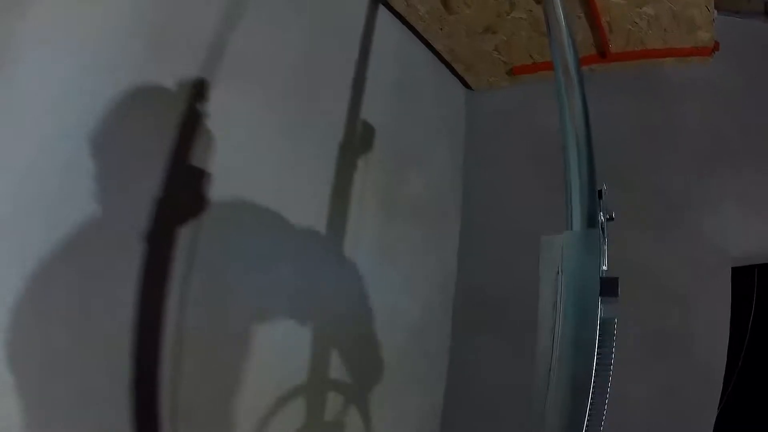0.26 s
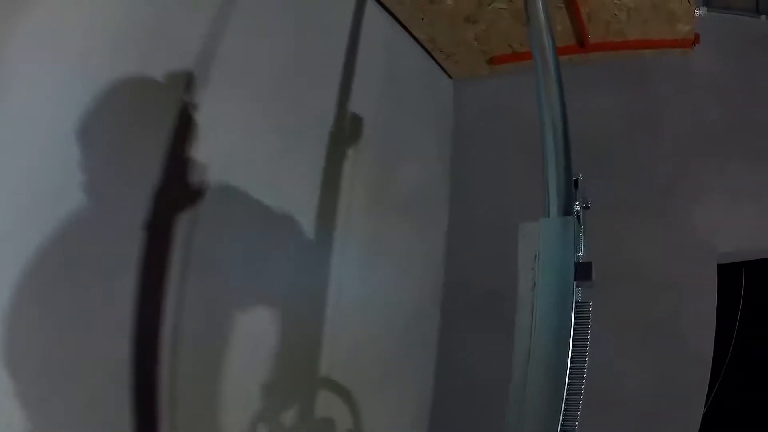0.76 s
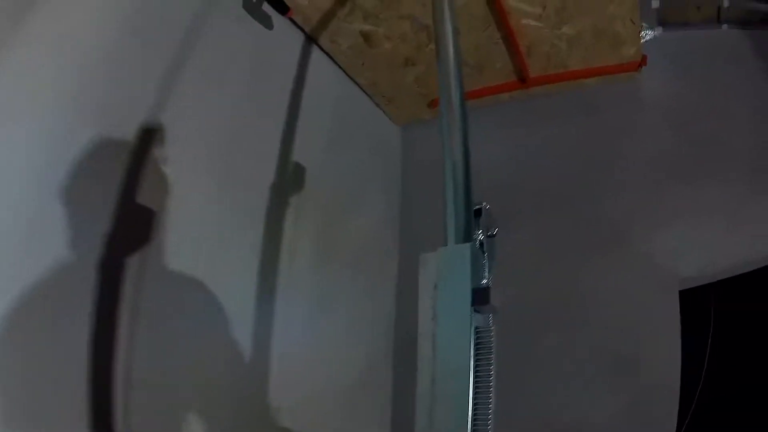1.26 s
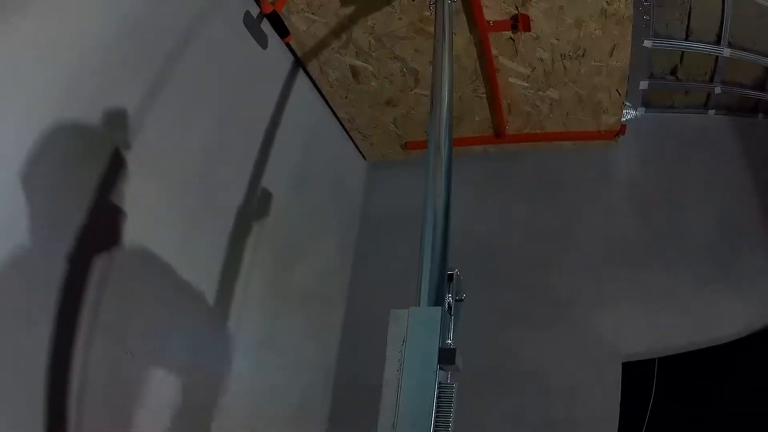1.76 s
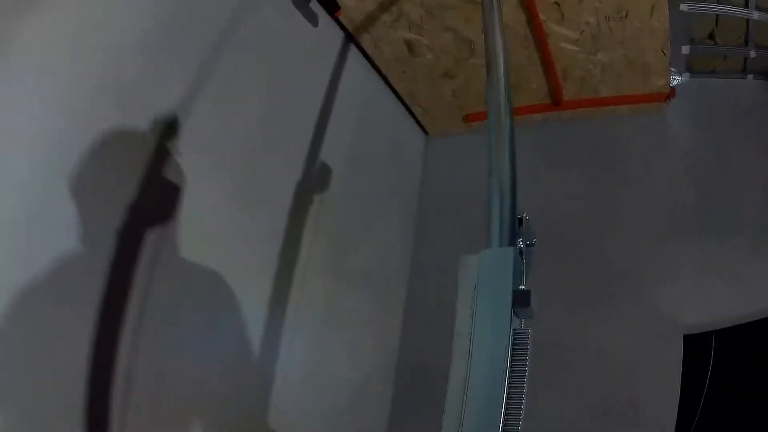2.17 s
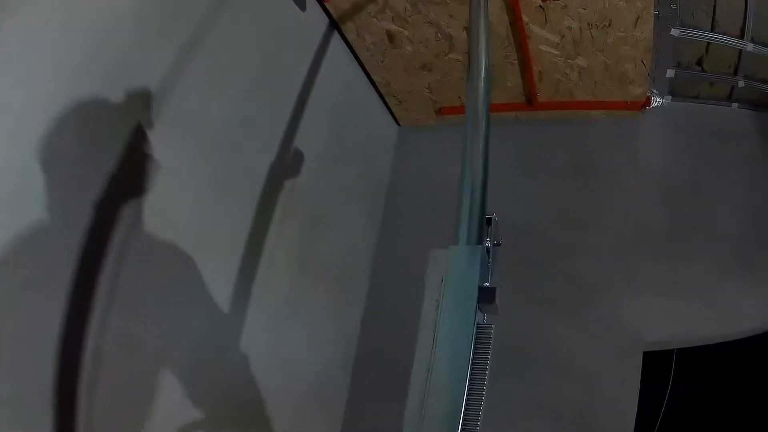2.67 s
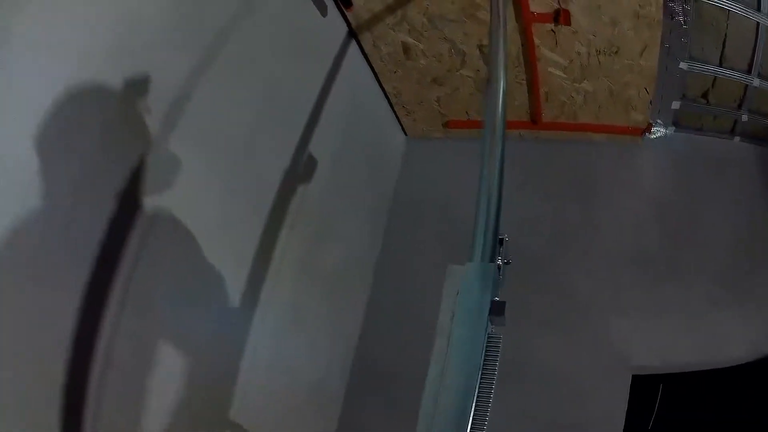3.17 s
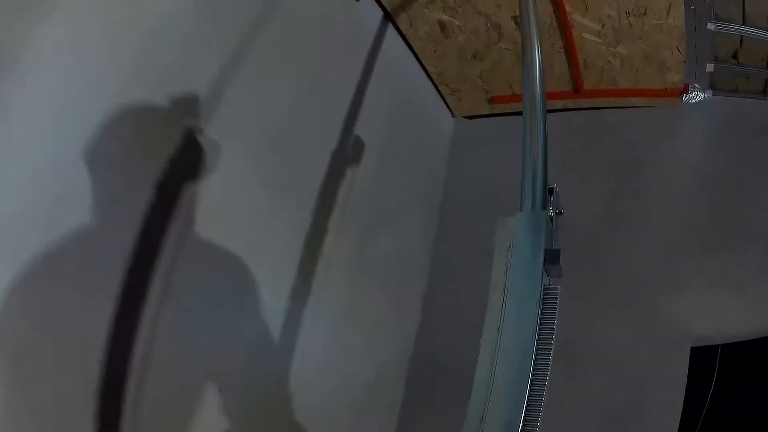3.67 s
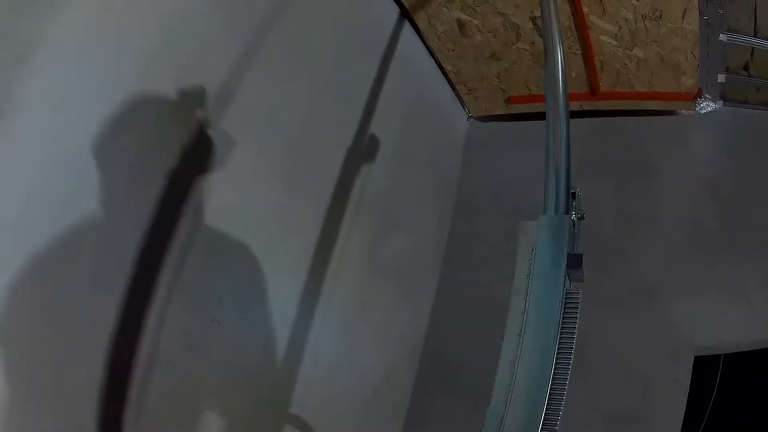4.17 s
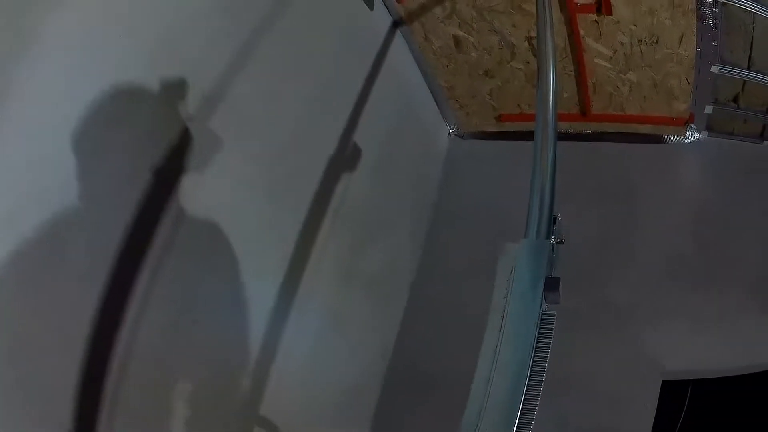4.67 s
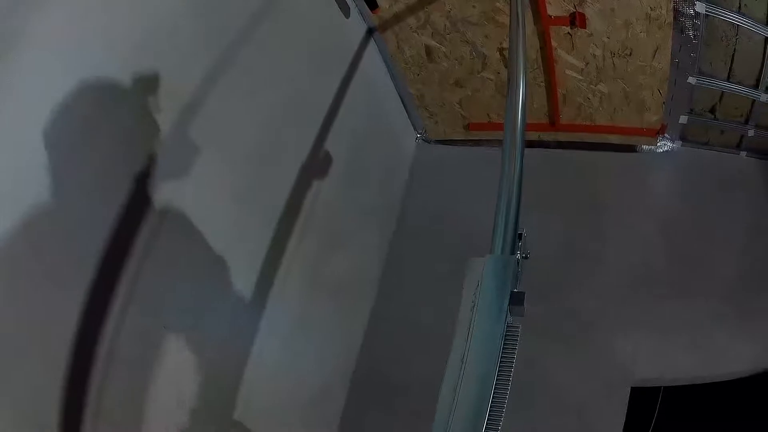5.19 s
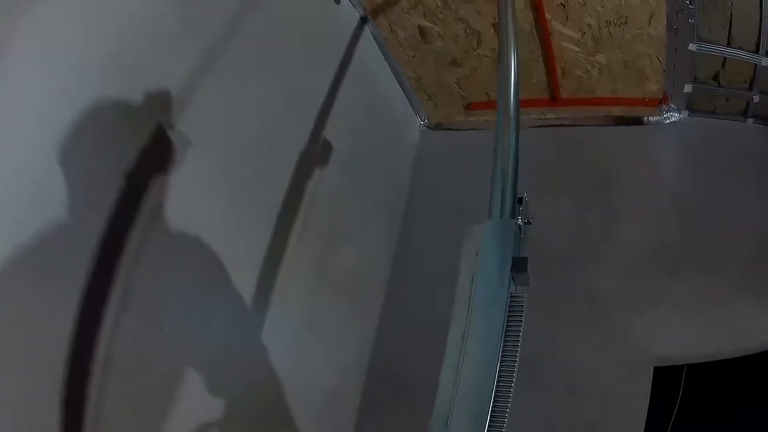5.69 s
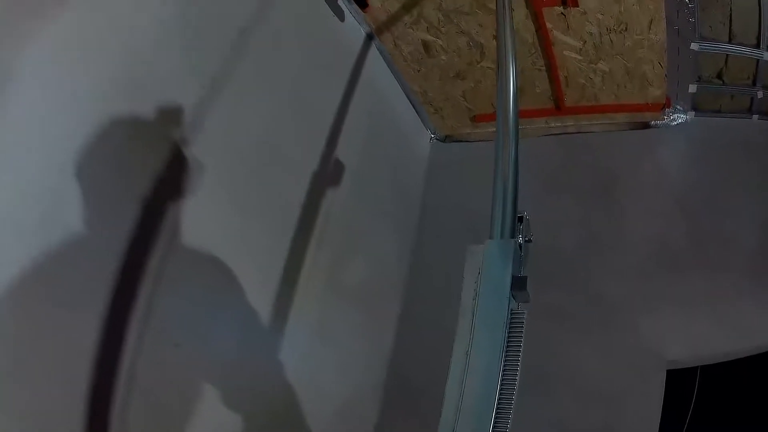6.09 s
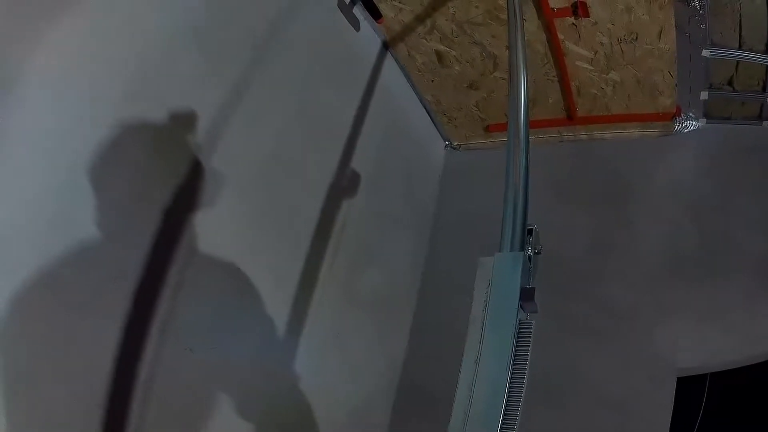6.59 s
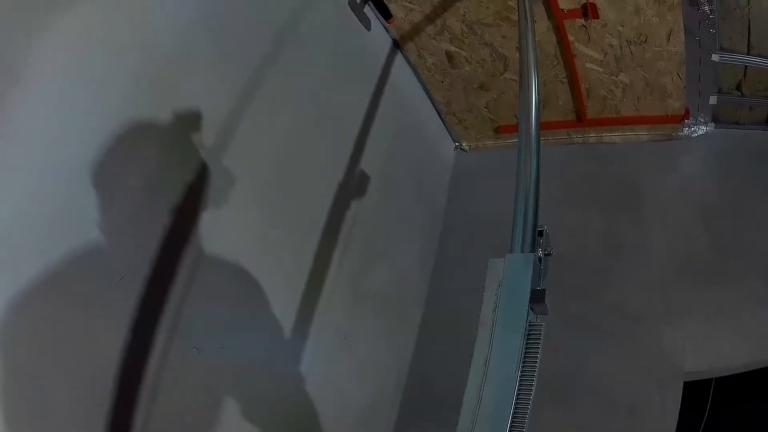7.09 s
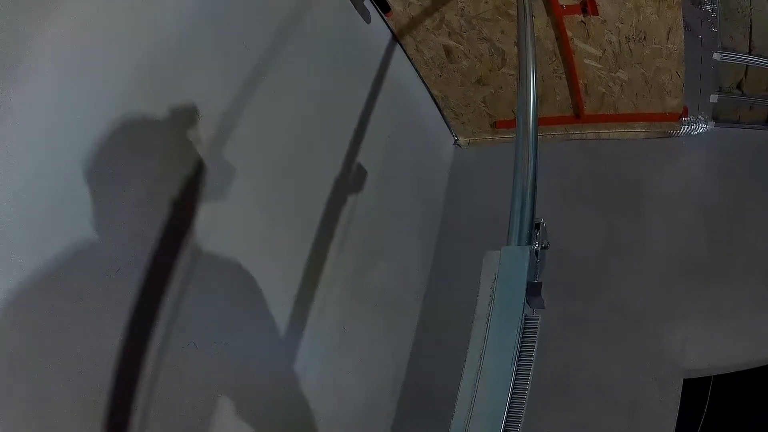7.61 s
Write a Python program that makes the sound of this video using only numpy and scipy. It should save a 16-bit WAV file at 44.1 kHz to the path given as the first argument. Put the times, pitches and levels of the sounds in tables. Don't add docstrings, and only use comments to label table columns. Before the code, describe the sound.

A hand winch cranks with fast, ringing metal ratchet clicks and gear grinding, pauses, then gives one short burst before quiet knocks and rustles.

```python
import sys
import numpy as np
from scipy import signal
from scipy.fft import rfft, irfft, next_fast_len
from scipy.io import wavfile
from scipy.ndimage import uniform_filter1d, map_coordinates

SR = 44100
rng = np.random.default_rng(int(sys.argv[2]) if len(sys.argv) > 2 else 0)


def file_out(sig):
    cols = np.atleast_2d(sig).T
    lim = np.clip(cols, -1, 1)
    pcm = np.round(lim * 32767).astype(np.int16)
    wavfile.write(sys.argv[1], SR, pcm)


def gain_from_decibels(decibels):
    exponent = np.asarray(decibels, float) / 20
    return 10 ** exponent


N = 346185

# t/s, level/dB
EFFORT_SPANS = [
    [(0.0, -35.5), (0.45, -34), (0.66, -39.5), (1.2, -33.5), (1.42, -36), (1.53, -59), (1.55, -30.5),
     (1.76, -42), (1.78, -29)],
    [(1.78, -31.5), (1.89, -40), (1.92, -28.5), (1.96, -35), (2.76, -34), (2.99, -36), (3.9, -35.5),
     (3.95, -38)],
    [(5.098, -51), (5.156, -36), (5.3, -37.5), (5.588, -37), (5.63, -43)],
]
# t/s, snap level/dB, weight level/dB, seat on wheel/rad
PULL_1 = [(0.0423, -37.5, -25, 0), (0.0917, -34, -25, 2), (0.1351, -30, -28, 0), (0.1656, -31, -24.5, 2.5),
          (0.2124, -31.5, -28, -2.5), (0.2608, -24.5, -27, 2.5), (0.2943, -22.5, -27, 2.5),
          (0.3268, -24.5, -25, 0.8), (0.3815, -28, -35, -6), (0.405, -22.5, -24, -3.5),
          (0.4205, -22, -33.5, 1.5), (0.5057, -29, -26.5, -1.5), (0.5377, -22, -34, -3),
          (0.5746, -22, -28, -4.9), (0.601, -19, -29, 0.7), (0.665, -26, -20, 0.5),
          (0.7492, -20.5, -26, -2), (0.783, -22.5, -25.5, -1.5), (0.847, -25, -26, 3),
          (0.8755, -23, -34, -2), (0.91, -23, -32.5, -6.5), (0.9724, -31.5, -31, 4),
          (1.0382, -28, -27.5, 2.5), (1.0642, -22.5, -22, 1.1), (1.1013, -23, -33, -3.3),
          (1.1743, -28, -31.5, -1.6), (1.254, -29, -39, 3.5), (1.322, -31, -30.5, -5),
          (1.423, -39.5, -36, 3)]
PULL_2 = [(1.5349, -26.5, -30, 2.5), (1.5644, -26.5, -35.5, -3.5), (1.651, -26, -38.5, 0.5),
          (1.705, -36, -31, 1), (1.7618, -27.5, -28.5, 7.5), (1.8094, -29, -41.5, 7),
          (1.8469, -30.5, -35.5, 0.8), (1.8929, -26.5, -23, -5), (1.948, -32, -26.5, 1),
          (1.9978, -25, -38, 6.5), (2.0571, -26.5, -32, 0.8), (2.114, -27.5, -19.5, 0.4),
          (2.1569, -28.5, -30, -5), (2.2007, -22.5, -27.5, -4), (2.231, -29.5, -34, -9.5),
          (2.288, -25, -29, -0.6), (2.3251, -26, -30.5, 2.3), (2.4058, -35, -34.5, 6),
          (2.4329, -25.5, -24.5, -4), (2.4792, -24.5, -33.5, 1.5), (2.538, -27.5, -45.5, 3),
          (2.582, -27, -36, -8.5), (2.6532, -30.5, -26, 1), (2.706, -32, -24.5, 0.4),
          (2.7322, -26.5, -31.5, -5), (2.7657, -23.5, -31, 2.5), (2.8145, -23.5, -28, 4),
          (2.8885, -21.5, -23.5, 2.5)]
PULL_3 = [(2.957, -37.5, -23.5, 1.5), (3.05, -30.5, -34, 3), (3.151, -22.5, -30, -1),
          (3.195, -31, -28, 0.4), (3.2372, -30.5, -31, 2.5), (3.3248, -38, -28.5, 0.7),
          (3.3617, -34.5, -26.5, 0), (3.4353, -30, -30, -1), (3.477, -32.5, -28, 2), (3.5174, -28, -43, -9),
          (3.5543, -32, -31, -1), (3.5776, -30.5, -24, 1.0), (3.613, -32, -21.5, 1), (3.644, -25, -27, 0.6),
          (3.675, -27, -26.5, -3), (3.7025, -30, -31, -1.5), (3.7918, -36.5, -25, 0.2),
          (3.863, -32.5, -36, -10), (3.911, -32, -50, -7), (3.935, -41, -48, 5)]
PULL_4 = [(5.0989, -44, -40.5, 2.5), (5.1137, -36, -38, -1.5), (5.1395, -39.5, -40, -4),
          (5.1686, -28, -30, -2.5), (5.207, -33.5, -31, -1.8), (5.2549, -27, -26, -3),
          (5.3023, -31.5, -32.5, -1.5), (5.3282, -30.5, -27.5, -1.5), (5.3773, -27.5, -39.5, -0.7),
          (5.424, -25, -30.5, -3), (5.453, -26.5, -29.5, -1.5), (5.4848, -28.5, -33, 0.5),
          (5.5352, -30, -32, -3), (5.5582, -30.5, -32, -2), (5.5894, -40.5, -43, -2)]
LIGHT_EARLY = [(0.4871, -27.5, -28.0, 0), (0.6475, -30, -31.0, 2.9), (0.7108, -41, -26, 0.9),
               (0.81, -37, -31, 2.5), (0.9379, -40.5, -27.0, -3), (0.9855, -28.5, -37, 0),
               (1.0027, -41.5, -35.5, -4.5), (1.1324, -39, -31, -6.5), (1.1565, -44, -42, 8.5),
               (1.2003, -32.5, -29, -1.1), (1.2322, -31, -27.5, -1), (1.287, -36, -33, 0.4),
               (1.3878, -35, -32, -1.9), (1.4394, -45, -34.5, -0.5), (1.605, -38, -31.5, 1.5),
               (1.672, -37.5, -36.5, 4), (1.782, -31.5, -33, 2.5), (1.8627, -31, -27.5, 0.5),
               (2.0713, -33.5, -22, 0.3), (2.17, -39.5, -34.5, 1), (2.2499, -27, -35, -3.5),
               (2.3737, -47, -29.5, 1.5), (2.4614, -36.5, -25, -1.7), (2.5582, -32.5, -37, 5),
               (2.6101, -36, -27.5, -0.3), (2.6778, -37.5, -36, 1.5), (2.828, -30.5, -39.5, 1.5),
               (2.8486, -43.5, -32, 1.7)]
LIGHT_LATE = [(2.9293, -40.0, -27.0, -1), (2.9912, -39, -32, 2.5), (3.0351, -44.5, -23, 0.9),
              (3.064, -33, -34, 0.5), (3.082, -41, -26.5, -3.5), (3.095, -42.0, -29.5, -0.5),
              (3.1239, -41.0, -27.5, 0), (3.2815, -39.5, -28, 1), (3.4202, -43, -28.5, -0.5),
              (3.4581, -34, -28, -0.5), (3.4971, -42.5, -37, -0.5), (3.532, -42.5, -43, 0),
              (3.5908, -36.5, -26.0, -1.3), (3.7385, -42.5, -28.5, 1.0), (3.8433, -46, -32.5, -2),
              (3.8961, -43.5, -35.5, 0.1), (5.1273, -44.0, -37.5, -0.5), (5.2301, -43.5, -31.5, -1.5),
              (5.266, -33.5, -29.5, 4.5), (5.283, -40, -39.5, 2), (5.3139, -41.5, -34, -3.5),
              (5.3548, -42, -32.5, 1), (5.4097, -41, -39.5, -4), (5.6093, -52, -42, -1)]
LOAD_DB = [-13, -11, 1, 9]
# f/Hz, width/Hz, level/dB
WHEEL = [(3040, 33.2, 4), (3983, 36.2, 6.5), (5009, 37.7, 8), (2220, 120, 0), (3445, 53, -13),
         (6776, 75, 5.5), (7150, 60, 1), (9914, 64.4, 2), (10440, 55, -12.5), (11750, 60, -12.5),
         (12900, 180, -22), (13800, 140, -24.5), (14700, 180, -11.5), (15100, 70, -28)]
# f/Hz, width/Hz, level/dB
FRAME = [(781, 27, 12), (1015, 270, 5), (1362, 40, 6), (1670, 370, -4), (2480, 60, -20.5)]
# f/Hz, level/(dB per Hz)
GRIND = [(150, -47), (250, -23.5), (563, -14.5), (768, -9.5), (2020, -8.5), (3010, -4), (3960, -3),
         (5040, 0.5), (7000, -9), (9070, -15), (11000, -20.5), (13000, -33.5), (15500, -55)]
# t/s, peak level/dB, attack/s, hold/s, fade/(dB per s)
HEAVES = [(.38, -39.5, 0.024, 0.068, 34), (1.05, -44, 0.038, 0.28, 69), (1.88, -38, 0.026, .03, 40),
          (2.25, -38.5, 0.034, 0.016, 148), (2.5, -41.5, 0.018, .02, 15), (3.2, -44.5, 0.033, 0.23, 32),
          (3.94, -51.5, 0.018, .02, 41), (4.24, -60.5, .02, 0.48, 83), (4.73, -43, 0.096, 0.018, 110),
          (4.95, -53, 0.037, 0.6, 68), (6.62, -56, 0.19, .02, 50), (7.285, -58, 0.022, 0.45, 31),
          (7.81, -45, 0.026, .1, 30)]
# f/Hz, level/(dB per Hz)
RUMBLE = [(12, -41.5), (20, -11.5), (112, 1.5), (141, 3), (177, 3), (206, -5.5), (300, -7.5), (325, -18),
          (437, -3.5), (500, -8.5), (650, -37.5), (1100, -120)]
# f/Hz, level/(dB per Hz)
HISS = [(15, -43.5), (25, -6), (458, -11.5), (497, -15), (650, -14.5), (724, -14.5), (785, -16),
        (1180, -19), (11600, -26), (15600, -22)]
# f/Hz, t60/s
GARAGE = [(150, 0.25), (1000, 0.6), (4000, 0.51), (8000, 0.43), (15000, 0.59)]
# t/s, peak level/dB, f/Hz, t60/s
THUDS = [(1.92, -16, 1045, 0.11), (2.54, -19.5, 400, 0.062), (3.958, -25.5, 363, 0.13),
         (4.249, -43.5, 81, 1), (4.551, -47, 265, 0.26), (4.75, -40.5, 173, 0.28), (4.814, -29, 155, 0.35),
         (5.576, -12.5, 286, 0.042), (5.862, -35.5, 438, 0.085), (6.125, -50, 702, 0.099),
         (6.725, -43, 165, 0.46), (7.303, -30, 131.6, 0.39), (7.575, -33.5, 110.2, 0.63),
         (7.303, -37, 45, 0.57), (7.577, -41, 39.4, 0.68), (6.736, -45, 40, 0.75), (4.25, -52, 40, 0.47)]
# t/s, peak level/dB
COGS_SLACK = [(2.8894, -39), (2.9168, -34.5), (2.9447, -40), (2.9946, -40), (3.0171, -36), (3.0844, -37),
              (3.1024, -31), (3.1388, -29), (3.2296, -33), (3.253, -29), (3.2919, -30), (3.4241, -26),
              (3.465, -24), (3.5249, -30), (3.5588, -23), (3.6416, -31.5), (3.7374, -36), (3.7699, -26),
              (3.8402, -27), (3.8931, -27), (3.9355, -39), (3.9584, -42)]
COGS_TIGHT = [(5.1038, -35), (5.1282, -35.5), (5.1522, -32), (5.1687, -31.5), (5.1821, -24), (5.2111, -23),
              (5.2405, -23.5), (5.2654, -33.5), (5.2884, -25), (5.3143, -32.5), (5.3378, -28),
              (5.3587, -29), (5.3827, -23.5), (5.4086, -25), (5.436, -29), (5.4645, -22.5), (5.4864, -32),
              (5.5223, -28), (5.5478, -23.5), (5.5702, -24), (5.5917, -31.5)]
# f/Hz, level/dB
GEAR = [(2260, -1), (3480, -5.5)]
# t/s, peak level/dB, centre f/Hz, t60/s
KNOCKS = [(3.935, -20.5, 8860, 0.0067), (3.954, -19, 4030, 0.013), (4.036, -20.5, 2800, 0.014),
          (4.3, -53.5, 3500, .03), (4.382, -48, 1500, .04), (4.43, -54.5, 2490, 0.027),
          (4.572, -42, 3500, 0.015), (4.806, -25, 2140, 0.091), (5.85, -41, 1520, .06),
          (5.912, -41, 6850, 0.006), (6.489, -51.5, 4490, 0.033), (6.607, -47, 4700, 0.0293),
          (6.72, -44, 6000, 0.008), (6.724, -41, 5500, 0.009), (6.803, -44, 4000, 0.014),
          (6.823, -35, 5490, .005), (6.835, -40, 6520, .006), (6.886, -37.5, 6000, 0.0067),
          (6.979, -27, 4020, 0.006), (6.985, -50, 2990, .2), (7.464, -40, 12150, 0.012),
          (7.569, -40.5, 11930, .01), (7.658, -26, 9980, 0.006), (7.822, -47, 6000, 0.0157),
          (7.835, -24.5, 8440, 0.006), (7.836, -33.5, 2990, 0.05)]
# t/s, peak level/dB, centre f/Hz
CRACKLES = [(6.733, -46.5, 7000), (6.781, -53, 8000), (6.879, -43, 3000), (6.916, -49.5, 5970),
            (6.921, -56, 1700), (6.973, -48.5, 7500), (6.994, -46.5, 8000), (7.006, -43, 6440),
            (7.018, -46.5, 5040), (7.264, -54.5, 8130), (7.319, -48, 8500), (7.352, -53.5, 4480),
            (7.424, -49.5, 5500), (7.558, -50.5, 6000), (7.581, -50.5, 9000), (7.588, -50.5, 7000),
            (7.605, -48.5, 7030), (7.627, -48, 10300), (7.654, -43, 10870), (7.807, -54, 11000)]
# t/s, peak level/dB, attack/s, hold/s, fade/(dB per s)
RUSTLE = [
    (4.15, -64.5, 0.21, 0.024, 17),
    (4.62, -63.5, .18, .02, 200),
    (6.35, -65, 0.18, 0.17, 30),
    (6.7, -60, 0.069, 0.14, 32),
    (7.29, -59, .04, .3, 30),
    (7.45, -55.5, 0.1, .15, 60),
    (7.8, -50.5, .04, .1, 30),
]
# f/Hz, level/(dB per Hz)
CLOTH = [(290, -30), (500, 0), (638, -2.5), (901, -5), (1960, -6), (2650, -6.5), (4770, -7.5),
         (15500, -18.5)]
# f/Hz, level/dB, t60/s
LEVER = [(1308, -4.5, 0.23), (1780, -1.5, 0.12), (2410, -6, .08), (1060, -1, .08), (3429, -17, .08),
         (4177, -17, .08)]
# t/s, level/dB
LEVER_AT = (4.38, -52)
# f/Hz, width/Hz, level/dB, t60/s
CLUNK = [(965, 75, 3, 0.15), (1290, 190, -17, 0.88), (780, 300, -13.5, 0.84), (2590, 72, -10, .5),
         (3700, 300, -8, .15), (7300, 1300, -15, .35)]
# t/s, level/dB
CLUNK_AT = (4.81, -42)

SEAT_DB = 7.5
TRAIL_S = 0.04
BRIGHT_DB, DULLS = -4.5, 0.12
SWAY_DB, SWAY_FOLLOWS, SWAY_SAG_DB_PER_S = -43, 0.5, 2.5
GESTURE_RISE_DB = 14.5
COG_RISE_S, COG_LEAD_S = 0.0026, 0.002047
CRACKLE_T60_S, SNAP = 0.006, 2.63
HISS_DB = -66.5
RING_ROOM = 0.53
GRIP_FROM_S, GRIP_ROOM = 6.3, 0.58
TOP_HZ = 15750
STARVE_HZ, STARVE_DB = 10400, -25


def unit(x):
    return x / np.sqrt(np.mean(x ** 2) + 1e-20)


def along(points, hz):
    f, v = np.transpose(points)
    return np.interp(np.log(hz + 1), np.log(f + 1), v)


def wobble(rate_hz):
    knots = rng.standard_normal(int(N * rate_hz / SR) + 4)
    return map_coordinates(knots, [np.arange(N) * rate_hz / SR])


def filtered(x, response):
    m = next_fast_len(N + SR // 2)
    return irfft(rfft(x, m) * response(np.fft.rfftfreq(m, 1 / SR)), m)[..., :N]


def resonance(f, hz, width):
    return 1j * f * width / (hz * hz - f * f + 1j * f * width)


def noise(spectrum):
    return unit(filtered(rng.standard_normal(N), lambda f: gain_from_decibels(along(spectrum, f))))


def patchy(x, patchy_db):
    z = signal.stft(x, nperseg=512)[2]
    field = uniform_filter1d(rng.standard_normal(z.shape), size=4, axis=0)
    field = uniform_filter1d(field, size=4, axis=1)
    return signal.istft(z * gain_from_decibels(patchy_db * unit(field)), nperseg=512)[1][:N]


def add(track, s, piece):
    part = track[round(s * SR):][:len(piece)]
    part += piece[:len(part)]


def gestures(rows):
    s, peak_db, attack, hold, fade = np.transpose(rows)[:, :, None]
    at = np.arange(0, N + 64, 64)
    t = at / SR - s
    rise_db = GESTURE_RISE_DB * np.clip(1 - t / np.abs(attack), 0, 9)
    fade_db = np.abs(fade) * np.maximum(t - attack - hold, 0)
    return np.interp(np.arange(N), at, (peak_db - rise_db - fade_db).max(axis=0))


def effort_db():
    levels = []
    for span in EFFORT_SPANS:
        s, db = np.transpose(span)
        levels.append(np.interp(np.arange(N) / SR, s, db, left=-120, right=-120))
    return np.max(levels, axis=0)


def teeth(firm):
    light = list(LIGHT_EARLY) + list(LIGHT_LATE)
    inside = [row for row in light if firm[0][0] < row[0] < firm[-1][0] + TRAIL_S]
    return sorted(list(firm) + inside)


def wheel_ring(t, db, weight_db, seat, load_db):
    hz, width, mode_db = np.transpose(WHEEL)[:, :, None]
    draw = rng.standard_normal((7, len(WHEEL), 1))
    level_db = db + mode_db + 1.6 * draw[0]
    seat_db = SEAT_DB * np.cos(seat - 2 * np.pi * np.arange(3) / 3)
    level_db[:3, 0] = weight_db + seat_db + mode_db[:3, 0]
    level_db[3] += load_db
    split = 0.83 * width * draw[1]
    pair = np.sin(2 * np.pi * (hz + 0.2 * width * draw[2]) * t)
    pair = pair + 0.63 * np.sin(2 * np.pi * (hz + split) * t + 0.65 * draw[3])
    rise_s = 0.0066 * (3000 / hz) ** 0.65 * gain_from_decibels(0.49 * draw[4])
    beads_db = 1.4 * np.sin(2 * np.pi * 70 * gain_from_decibels(4.4 * draw[5]) * t + 2 * draw[6])
    swell = (1 - np.exp(-t / rise_s)) ** 2 * np.exp(-2.1 * width * t)
    return np.sum(gain_from_decibels(level_db + beads_db) * swell * pair, axis=0)


def pawl():
    ring, scrape = np.zeros(N), np.zeros(N)
    for firm, load_db in zip([PULL_1, PULL_2, PULL_3, PULL_4], LOAD_DB):
        drops = teeth(firm)
        starts = [row[0] for row in drops]
        gaps_s = np.diff(starts + [starts[-1] + 0.04])
        for (s, db, weight_db, seat), gap_s in zip(drops, gaps_s):
            t = np.arange(round(gap_s * SR) + SR // 40) / SR
            damped = np.exp(-np.maximum(t - gap_s + 0.0022, 0) / 0.015)
            add(ring, s, gain_from_decibels(-2.0) * damped * wheel_ring(t, db, weight_db, seat, load_db))
            rub = (1 - np.exp(-t / 0.011)) * np.exp(-t / 0.0085)
            add(scrape, s, gain_from_decibels(0.84 * (db + 33.0)) * damped * rub)
    return ring, scrape


def winch():
    ring, scrape = pawl()
    effort = effort_db()
    bright_db = BRIGHT_DB - DULLS * np.maximum(effort + 36, -6)
    grind = patchy(noise(GRIND), patchy_db=2.5) * gain_from_decibels(1.3 * wobble(60) + 1.5 * wobble(300))
    tubes = filtered(grind, lambda f: sum(gain_from_decibels(db) * resonance(f, hz, w) for hz, w, db in FRAME))
    dull = filtered(grind, lambda f: 1 / (1 + (f / 2500) ** 4))
    keen = (0.25 + scrape) * (grind - dull)
    shimmer = filtered(keen, lambda f: sum(resonance(f, hz, 2.0 * w) for hz, w, _ in WHEEL))
    rubbing = (0.14 + scrape) * rng.standard_normal(N)
    sing = filtered(rubbing, lambda f: sum(gain_from_decibels(db) * resonance(f, hz, w) ** 2 for hz, w, db in WHEEL[7:]))
    lag = 0.48 + np.roll(uniform_filter1d(scrape, size=400), 300)
    frame = gain_from_decibels(-3.5) * unit(lag * dull) + gain_from_decibels(-8.5) * unit(lag * tubes)
    edge = gain_from_decibels(3.5) * unit(keen) + gain_from_decibels(-0.5) * unit(shimmer) + gain_from_decibels(-17.0) * unit(sing)
    return ring, gain_from_decibels(effort) * frame + gain_from_decibels(effort + bright_db) * edge


def sway():
    cranked_db = SWAY_DB + SWAY_FOLLOWS * (effort_db() + 36.5) - SWAY_SAG_DB_PER_S * np.arange(N) / SR
    level_db = np.maximum(cranked_db, gestures(HEAVES)) - 3.0
    return gain_from_decibels(level_db) * unit(gain_from_decibels(2.9 * wobble(14)) * noise(RUMBLE))


def thuds():
    out, t = np.zeros(N), np.arange(SR // 2) / SR
    f = np.fft.rfftfreq(len(t), 1 / SR)
    for s, db, hz, t60 in THUDS:
        hit = rfft(rng.standard_normal(len(t)))
        puff = unit(irfft(hit * resonance(f, 1.02 * hz, 1.22 * hz) ** 2, len(t)))
        push = 0.38 * np.sin(2 * np.pi * hz * t) + 0.65 * puff
        add(out, s, gain_from_decibels(db - 3.5 - 60 * t / t60) * (1 - np.exp(-t / 0.0077)) * push)
    return out


def gear():
    out, t = np.zeros(N), np.arange(SR // 30) / SR
    hz, mode_db = np.transpose(GEAR)[:, :, None]
    swell = t / COG_RISE_S * np.exp(1 - t / COG_RISE_S)
    for s, db in list(COGS_SLACK) + list(COGS_TIGHT):
        draw = rng.standard_normal((2, len(GEAR), 1))
        tone = gain_from_decibels(db + mode_db + 1.4 * draw[0]) * np.sin(2 * np.pi * hz * (1 + 0.021 * draw[1]) * t)
        add(out, s - COG_LEAD_S, swell * tone.sum(axis=0))
    return out


def ticks():
    out, t = np.zeros(N), np.arange(SR // 2) / SR
    f = np.fft.rfftfreq(len(t), 1 / SR)
    for s, db, hz, t60 in list(KNOCKS) + [(*row, CRACKLE_T60_S) for row in CRACKLES]:
        rise_s = 0.035 * t60
        burst = rng.standard_normal(len(t)) * gain_from_decibels(-60 * t / t60) * (1 - np.exp(-t / rise_s))
        burst[round(rise_s * SR)] += SNAP
        crack = irfft(rfft(burst) * resonance(f, hz, 2.1 * hz) ** 3, len(t))
        add(out, s, gain_from_decibels(db) * crack / np.abs(crack).max())
    return out


def rustle():
    grains = gain_from_decibels(2.1 * wobble(25) + 2.3 * wobble(400)) * noise(CLOTH)
    return gain_from_decibels(gestures(RUSTLE) + 1.0) * unit(grains)


def lever():
    out, t = np.zeros(N), np.arange(SR // 4) / SR
    ring = np.zeros(len(t))
    for hz, db, t60 in LEVER:
        flutter_db = 3.8 * np.sin(2 * np.pi * rng.uniform(30, 70) * t)
        ring += gain_from_decibels(db - 60 * t / t60 + flutter_db) * np.sin(2 * np.pi * hz * t)
    add(out, LEVER_AT[0], gain_from_decibels(LEVER_AT[1]) * (1 - np.exp(-t / 0.0018)) * ring)
    return out


def clunk():
    out, t = np.zeros(N), np.arange(SR // 2) / SR
    f = np.fft.rfftfreq(len(t), 1 / SR)
    rattle = rfft(rng.standard_normal(len(t)))
    tube = np.zeros(len(t))
    for hz, width, db, t60 in CLUNK:
        tube += gain_from_decibels(db - 60 * t / t60) * unit(irfft(rattle * resonance(f, hz, width), len(t)))
    add(out, CLUNK_AT[0], gain_from_decibels(CLUNK_AT[1]) * (1 - np.exp(-t / 0.0015)) * tube)
    return out


def garage(x):
    out, size = np.zeros(N + 2 * SR), SR // 4
    padded = np.pad(x, (size // 2, size))
    for start in range(0, N, size // 2):
        hz, t, z = signal.stft(rng.standard_normal(SR // 2), SR, nperseg=256)
        decay = gain_from_decibels(-60 * t / along(GARAGE, hz)[:, None])
        tail = signal.istft(z * decay, SR, nperseg=256)[1]
        piece = padded[start:start + size] * np.hanning(size)
        add(out, (start + 250) / SR, signal.fftconvolve(piece, tail / np.linalg.norm(tail)))
    return out[size // 2:][:N]


def scene():
    ring, grind = winch()
    moving = sway() + rustle()
    near = grind + thuds() + gear() + ticks() + lever() + clunk()
    near_room = np.where(np.arange(N) / SR < GRIP_FROM_S, 1, GRIP_ROOM)
    walls = garage(near_room * near + RING_ROOM * ring)
    return (ring + near + gain_from_decibels(-3.5) * walls + moving + gain_from_decibels(HISS_DB) * noise(HISS))[None]


def starved(x):
    hz, _, z = signal.stft(x, SR, nperseg=1024)
    power = np.abs(z) ** 2
    patch = uniform_filter1d(uniform_filter1d(power, size=9, axis=-2), size=3, axis=-1)
    middle = power[..., hz > 1000, :].mean(axis=-2, keepdims=True)
    middle = uniform_filter1d(middle, size=3, axis=-1)
    lost = (hz[:, None] > STARVE_HZ) & (patch < gain_from_decibels(2 * STARVE_DB) * middle)
    return signal.istft(np.where(lost, 0, z), SR, nperseg=1024)[1][..., :N]


def low_pass(x):
    return signal.sosfilt(signal.butter(12, 15760, fs=SR, output="sos"), x)


def record(dry):
    mix = starved(filtered(dry, lambda f: f < TOP_HZ))
    return low_pass(mix)


dry = scene()
out = record(dry)
file_out(out)
```